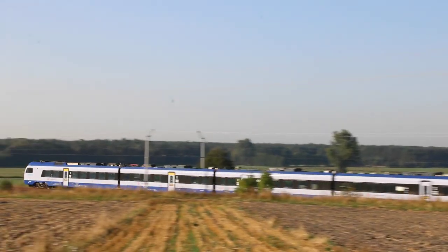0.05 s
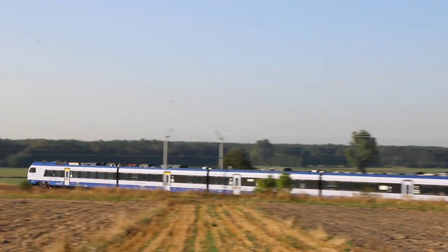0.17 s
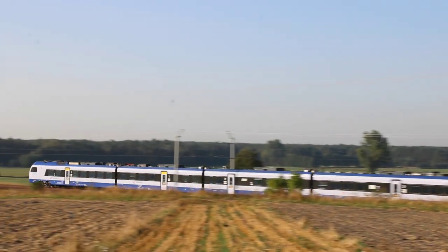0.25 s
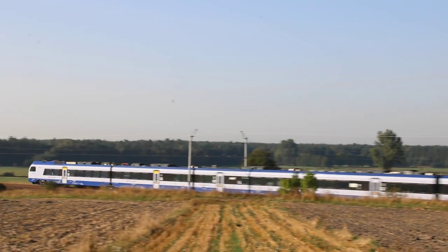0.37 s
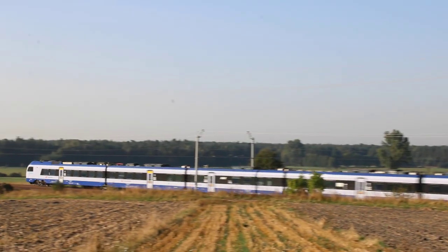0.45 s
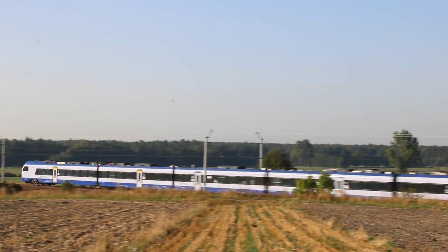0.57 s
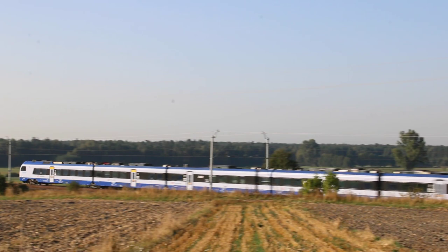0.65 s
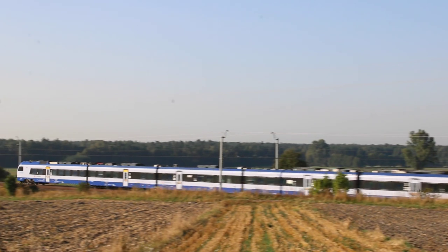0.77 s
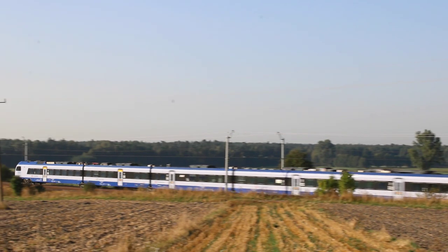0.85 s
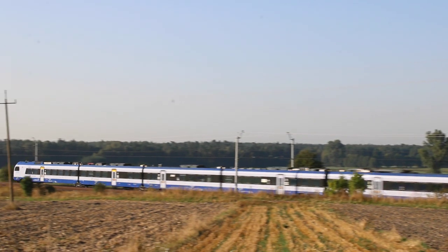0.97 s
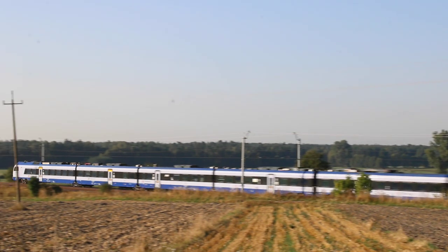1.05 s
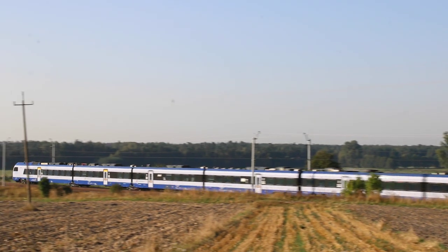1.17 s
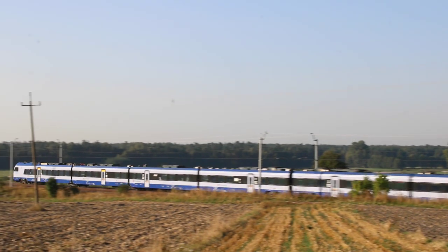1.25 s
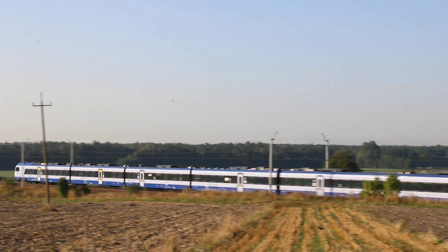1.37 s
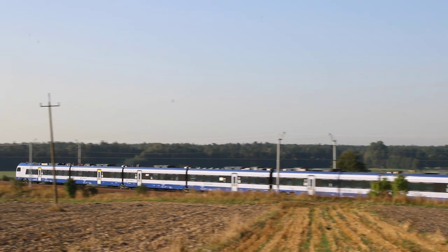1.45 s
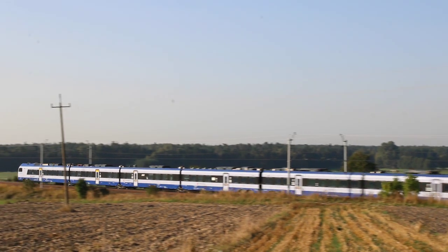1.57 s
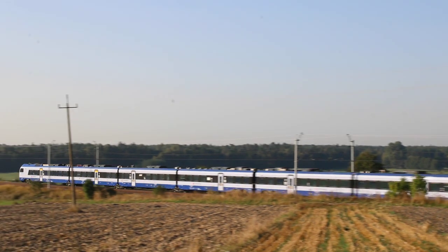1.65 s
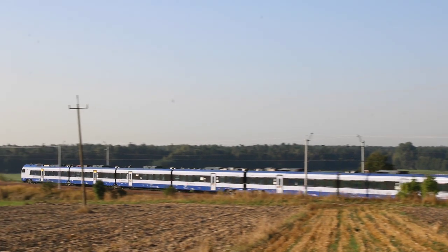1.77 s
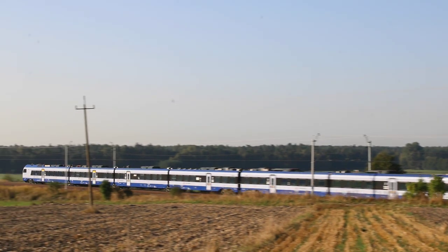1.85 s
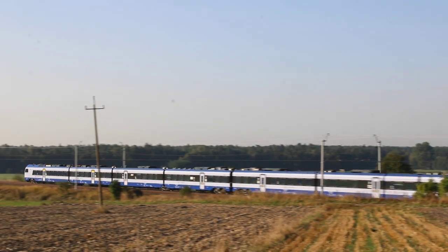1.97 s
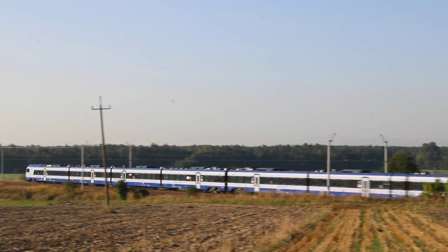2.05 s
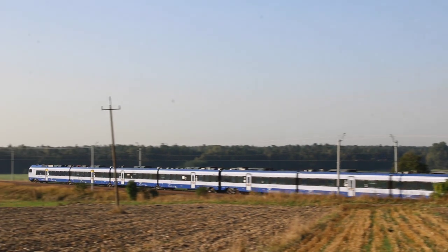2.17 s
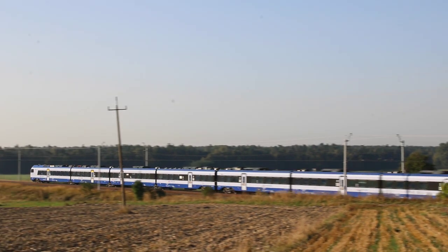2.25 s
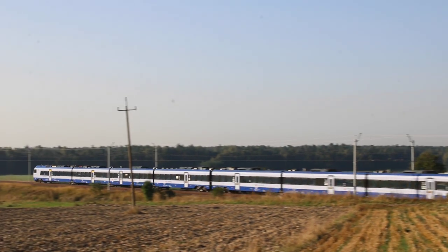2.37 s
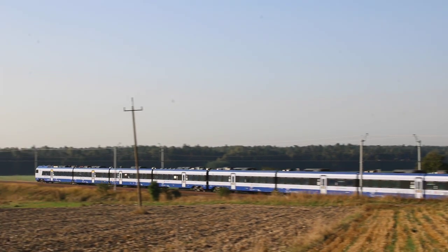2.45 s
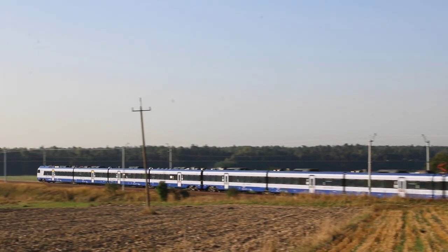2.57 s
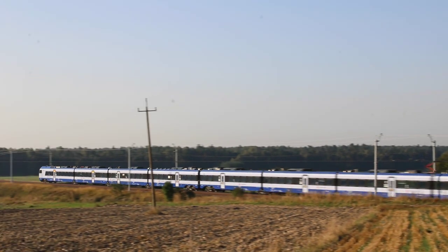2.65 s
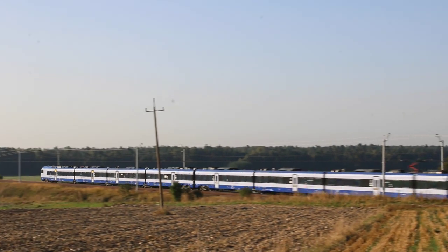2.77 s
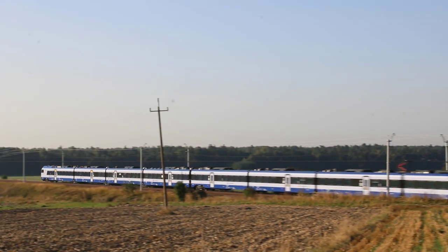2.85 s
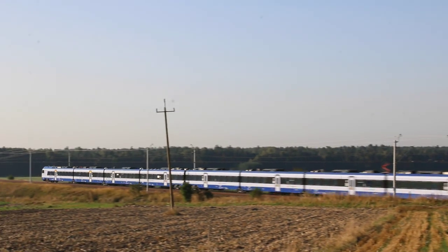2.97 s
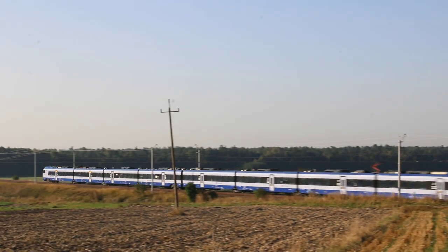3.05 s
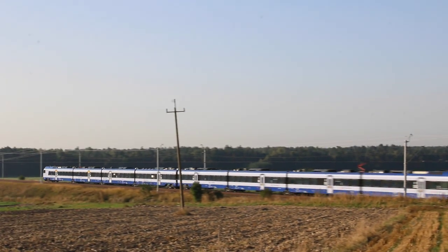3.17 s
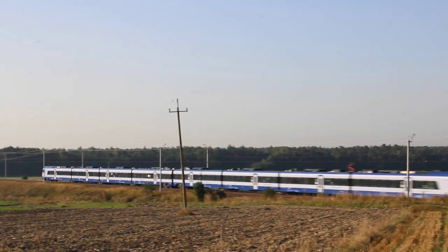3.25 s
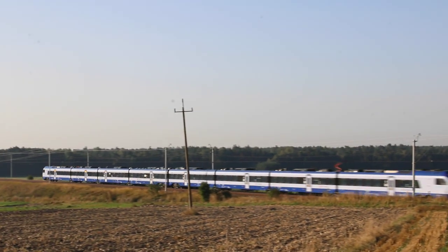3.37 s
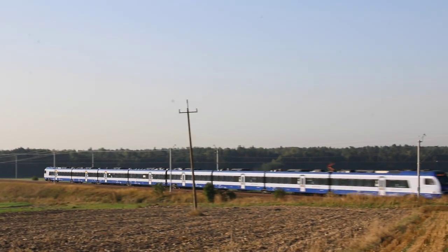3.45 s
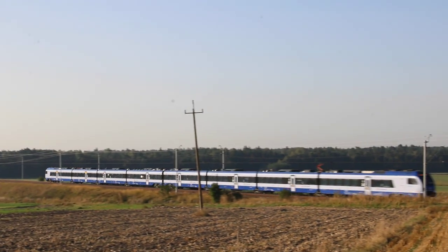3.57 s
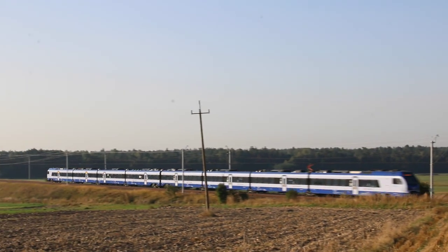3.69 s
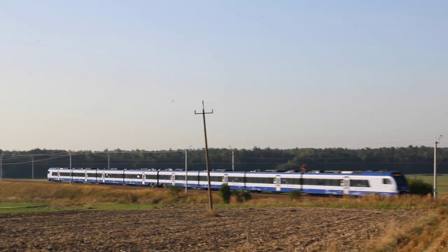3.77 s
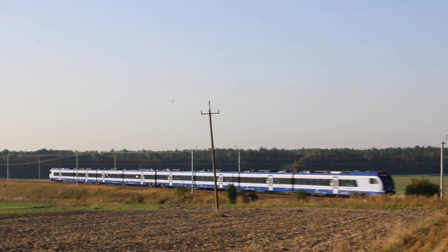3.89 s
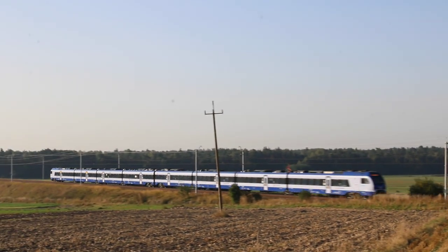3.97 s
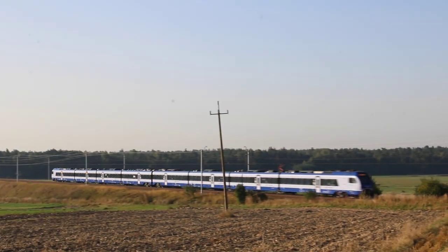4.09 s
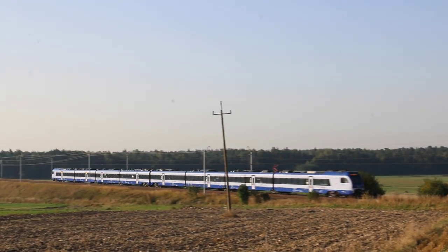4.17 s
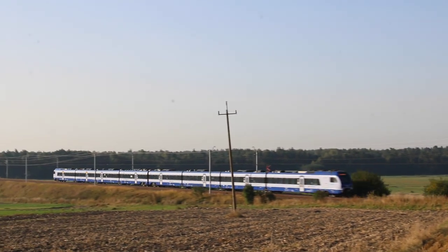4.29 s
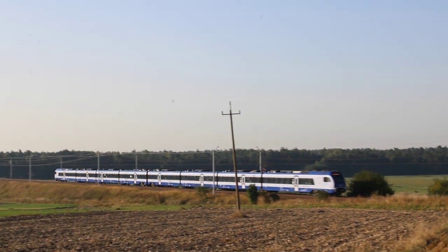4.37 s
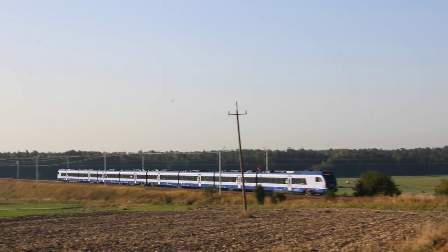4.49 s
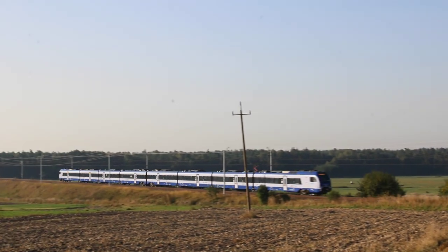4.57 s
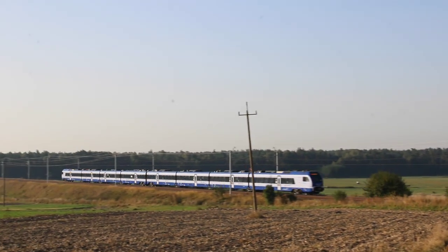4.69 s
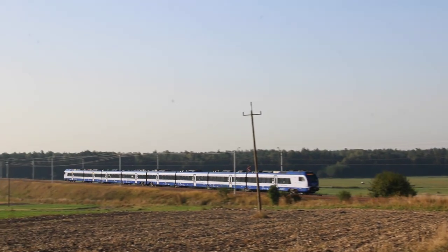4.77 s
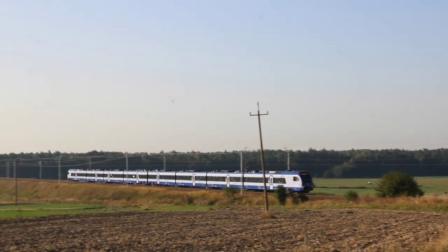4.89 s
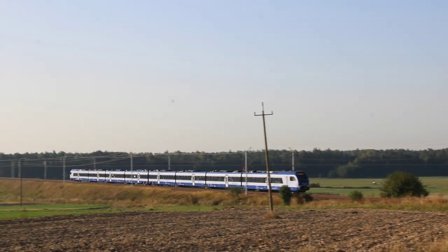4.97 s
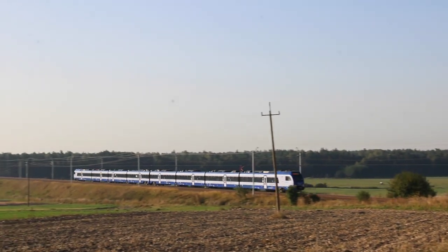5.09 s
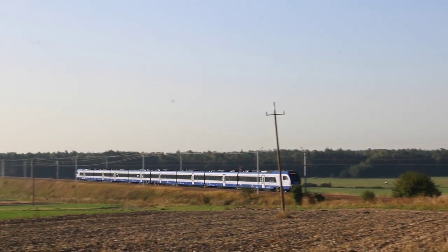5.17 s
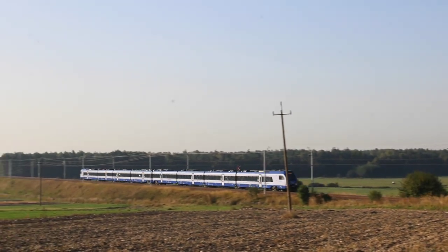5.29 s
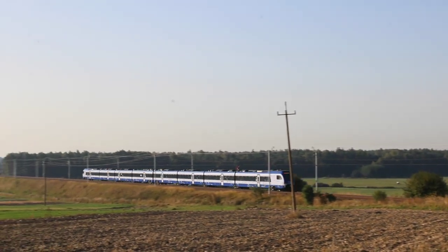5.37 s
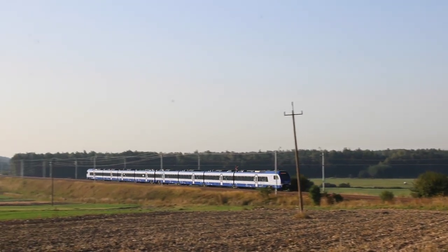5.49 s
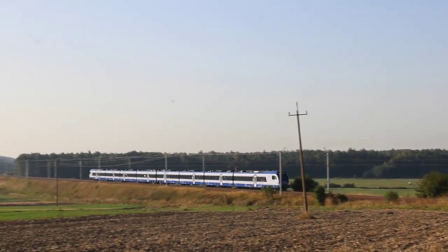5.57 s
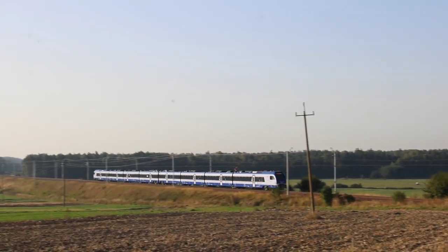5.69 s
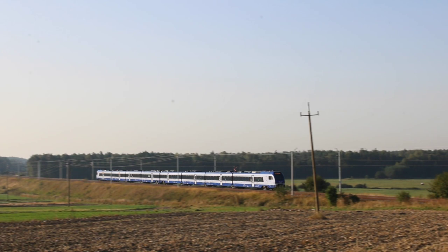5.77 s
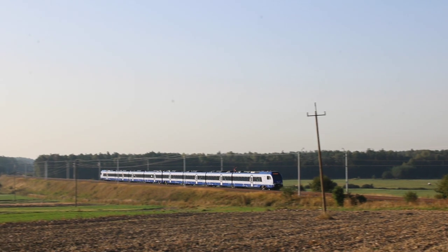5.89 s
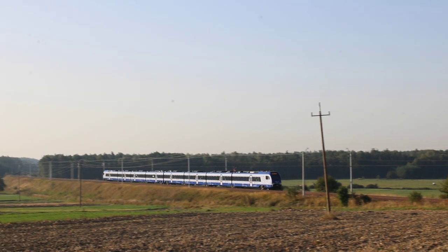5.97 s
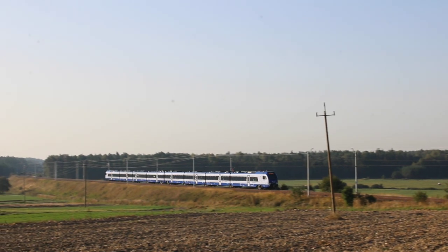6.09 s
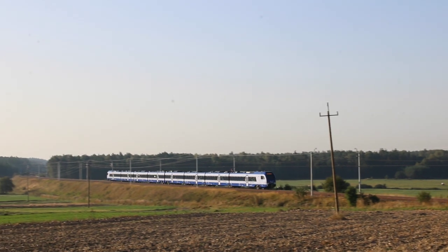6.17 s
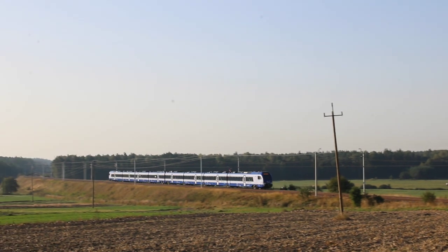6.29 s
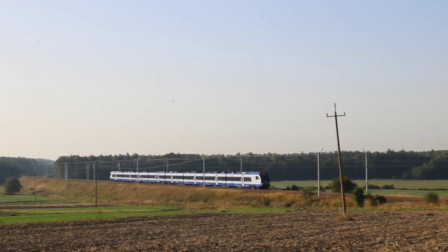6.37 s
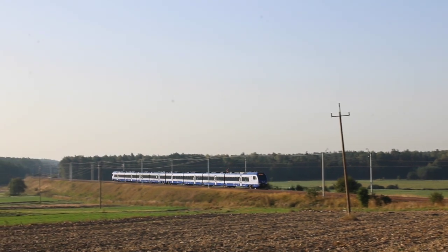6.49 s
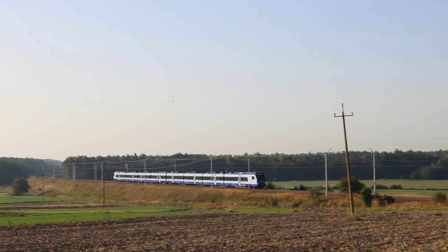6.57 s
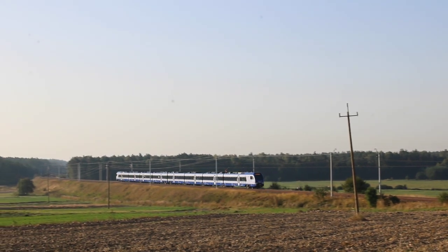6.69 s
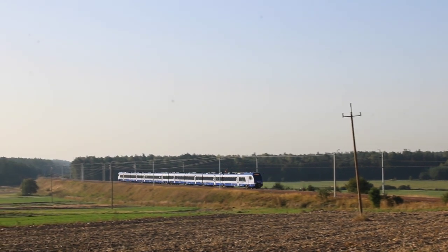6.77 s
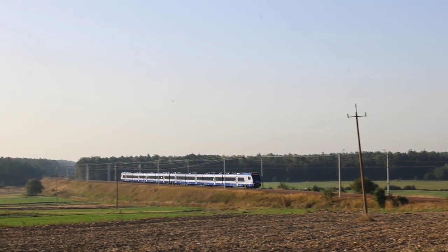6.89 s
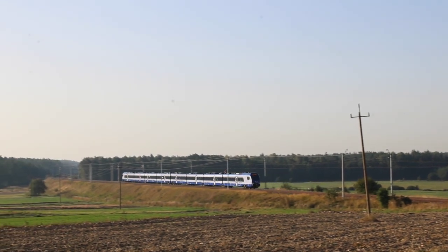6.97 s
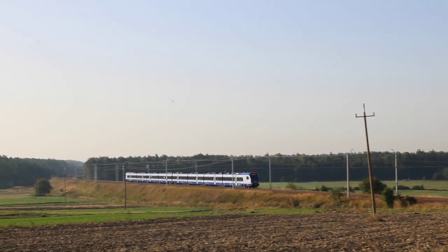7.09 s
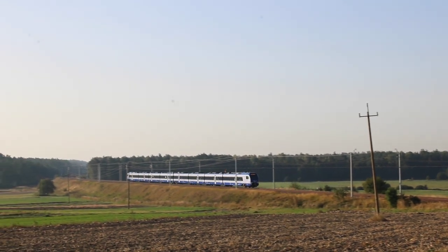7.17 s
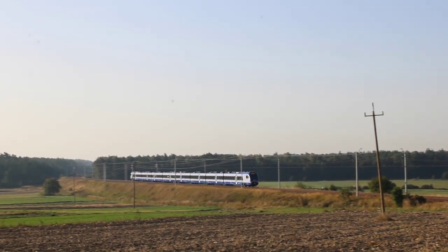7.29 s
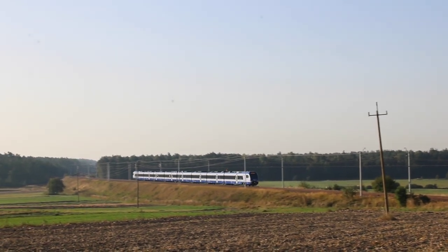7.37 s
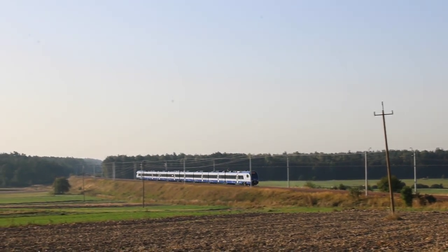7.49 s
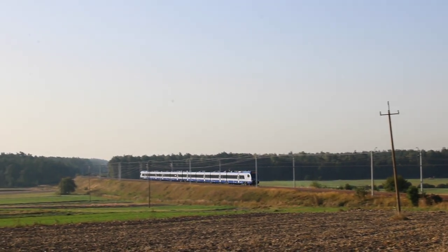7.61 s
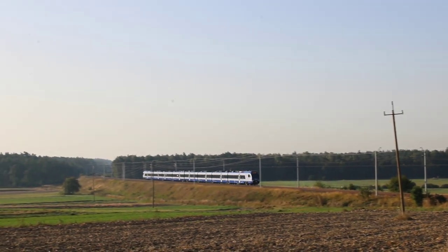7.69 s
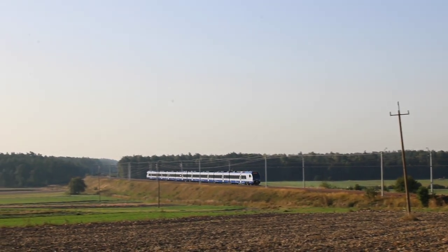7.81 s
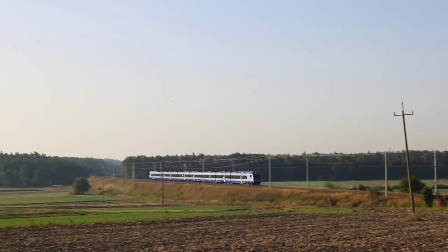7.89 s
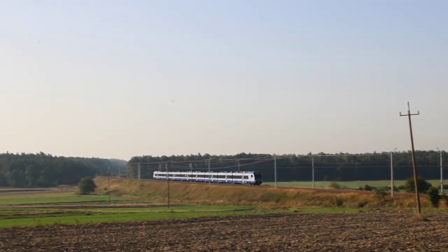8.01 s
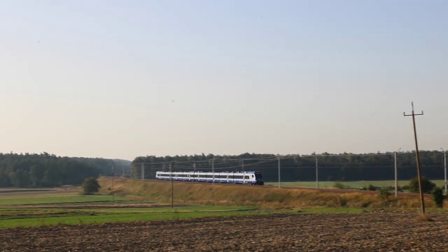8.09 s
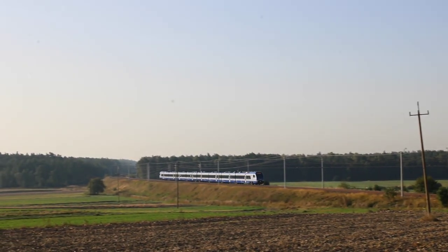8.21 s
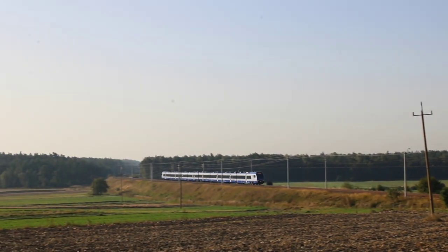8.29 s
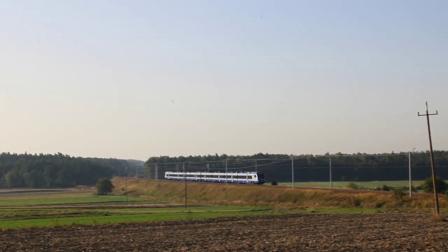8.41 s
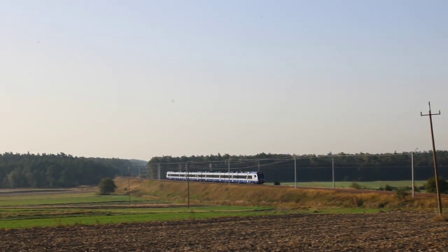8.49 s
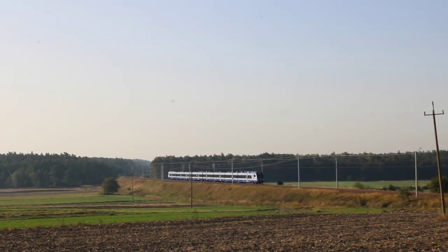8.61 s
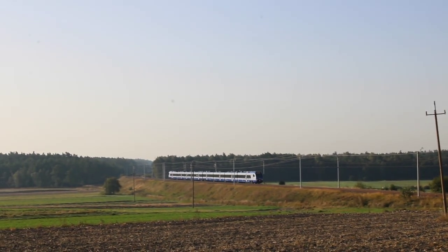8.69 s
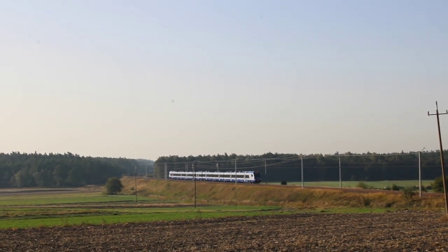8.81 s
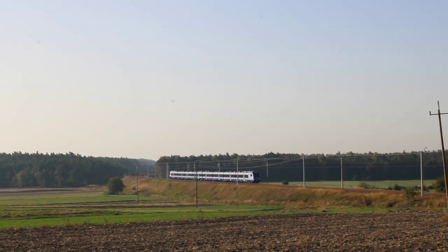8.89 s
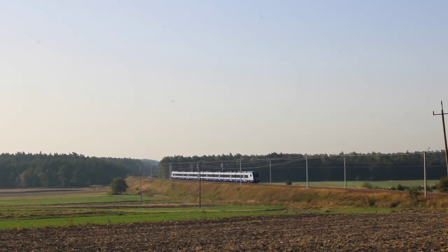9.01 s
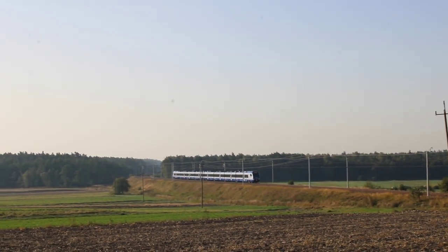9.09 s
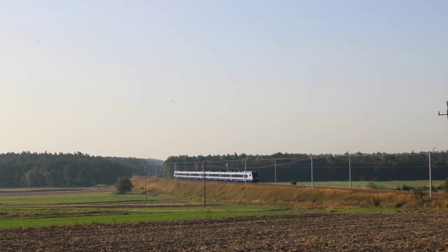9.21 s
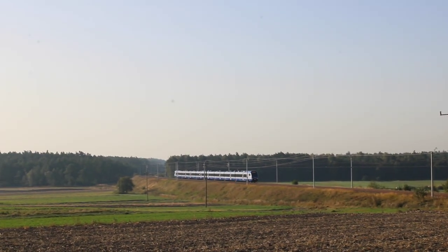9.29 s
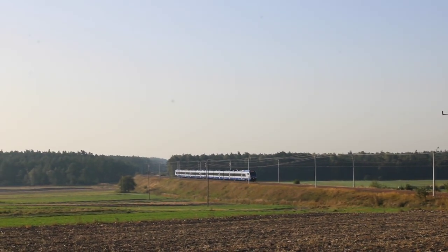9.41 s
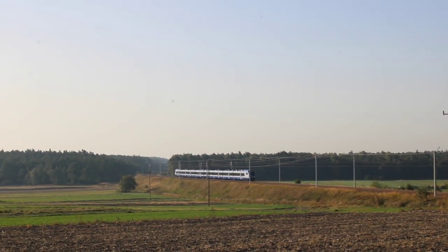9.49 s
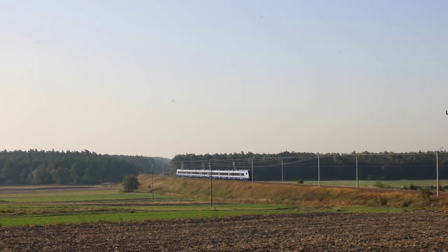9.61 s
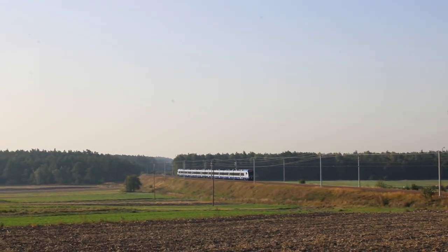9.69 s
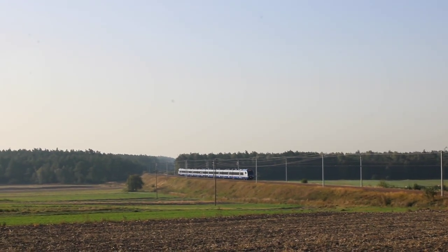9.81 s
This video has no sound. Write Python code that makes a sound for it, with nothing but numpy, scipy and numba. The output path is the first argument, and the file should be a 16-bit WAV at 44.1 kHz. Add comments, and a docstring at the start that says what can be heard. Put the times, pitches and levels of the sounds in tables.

```python
"""An electric train runs past across open fields and draws away, heard in a light breeze.
Rough rails set the wheels ringing and the drive whines, both sinking in pitch as the train recedes.
Under them the track roars and the coaches rumble; more and more air dulls the rolling noise and hiss.
Eddies thump on the microphone and the hardest duck its gain control; faint, high ticks sound close by."""
import sys
import numpy as np
from scipy import signal
from scipy.fft import rfft, irfft
from scipy.io import wavfile
from scipy.ndimage import uniform_filter1d, map_coordinates
from numba import njit

SR = 44100
rng = np.random.default_rng(int(sys.argv[2]) if len(sys.argv) > 2 else 0)


def digitize_waveform(pressure):
    """Quantize a signal to 16-bit integers and store it at the path in sys.argv[1].

    Rows of a 2-D input are taken as channels; values are limited to [-1, 1].
    """
    field = np.atleast_2d(pressure).T
    bounded = np.clip(field, -1, 1)
    quanta = np.round(bounded * 32767).astype(np.int16)
    wavfile.write(sys.argv[1], SR, quanta)


N = 434385
TIME = np.arange(N) / SR
FREQ = np.arange(N // 2 + 1) * SR / N
SPEED_M_PER_S, TRAIN_LENGTH_M, LINE_DISTANCE_M, NEAREST_S = 40, 160, 95, 1.0
# fader for the train's hiss, which the rumble also follows: time_s, level_db
HISS_FADER = [(0, -34.5), (1.3, -32), (2.8, -31), (4.2, -31.5), (7, -40), (9.85, -43)]


def undb(db):
    """Decibels to gain."""
    return 10 ** (np.asarray(db) / 20)


def fader(points):
    """Level in dB at each sample, from (time_s, level_db) points."""
    return np.interp(TIME, *np.transpose(points))


def bump(centre_s, length_s):
    """Smooth rise and fall, above half height for length_s."""
    return .5 ** ((2 * (TIME - centre_s) / length_s) ** 2)


def colour(points):
    """EQ curve through (freq_hz, level_db) points, rolled off below 15 Hz."""
    hz, db = np.transpose(points)
    return undb(np.interp(np.log(FREQ + 1), np.log(hz), db)) * FREQ ** 2 / (FREQ ** 2 + 15 ** 2)


def resonance(pitch_hz, width_hz):
    """EQ curve of a steep-sided resonance."""
    return 1 / (1 + ((FREQ - pitch_hz) / (0.76 * width_hz)) ** 2)


def bank(modes):
    """Joint EQ curve of (pitch_hz, width_hz, level_db) resonances."""
    return np.sqrt(sum((undb(db) * resonance(hz, width)) ** 2 for hz, width, db in modes))


def noise(eq):
    """Noise of rms 1 shaped by an EQ curve."""
    x = irfft(rfft(rng.standard_normal(N)) * eq, N)
    return x / x.std()


def wander(rate_hz):
    """Smooth random drift of rms 1 that changes about rate_hz times a second."""
    return noise(np.exp(-(FREQ / rate_hz) ** 2) * (FREQ > rate_hz / 8))


def distance(time_s):
    """Metres to the middle of the train."""
    return np.hypot(LINE_DISTANCE_M, SPEED_M_PER_S * (time_s - NEAREST_S))


def doppler(x, true_pitch_s=5.2):
    """Pitch sinks as the leading car recedes, passing its written value at true_pitch_s."""
    along_m = SPEED_M_PER_S * (TIME - NEAREST_S) + TRAIN_LENGTH_M / 2
    receding_mach = SPEED_M_PER_S / 343 * along_m / np.hypot(along_m, LINE_DISTANCE_M)
    ratio = 1 / (1 + receding_mach)
    ratio /= np.interp(true_pitch_s, TIME, ratio)
    return map_coordinates(x, [np.cumsum(ratio)], order=3, mode="wrap")


def air(x, pivot_hz, loss_db_per_khz_m, shimmer_db):
    """Distance tilts the spectrum; turbulence makes neighbouring bands fade in and out."""
    hz, time_s, frames = signal.stft(x, SR, nperseg=1024)
    metres = distance(time_s)
    above_pivot_khz = np.minimum(hz - pivot_hz, 4000) / 1000
    tilt_db = -loss_db_per_khz_m * np.outer(above_pivot_khz, metres - np.median(metres))
    fading = rng.standard_normal(frames.shape)
    for _ in range(2):
        fading = uniform_filter1d(fading, size=14, axis=0)  # across frequency
        fading = uniform_filter1d(fading, size=7, axis=1)  # across time
    frames *= undb(tilt_db + shimmer_db * fading / fading.std())
    return signal.istft(frames, SR)[1][:N]


@njit
def follow(x, attack, release):
    """Envelope that rises fast and falls slowly."""
    out, level = np.empty(len(x)), 0.
    for i in range(len(x)):
        level += (abs(x[i]) - level) * (attack if abs(x[i]) > level else release)
        out[i] = level
    return out


def microphone_hiss(level_db=-72):
    """A trace of the microphone's own noise."""
    # bright noise floor: freq_hz, level_db
    floor_eq = [(1000, -9), (10000, 13), (15000, -7)]
    return noise(colour(floor_eq)) * undb(level_db)


def ticks(decay_s=0.0018, faint_db=-45, faint_count=10):
    """Tiny dry ticks close to the microphone, with fainter ones at random among them."""
    # the clearest ticks, ahead of their EQ: start_s, level_db
    cues = [(4.0352, -35), (6.0467, -37), (6.1489, -33), (6.558, -35.5), (7.3611, -33), (8.8473, -34.5),
            (9.4873, -35), (9.642, -38.5), (9.8125, -37)]
    # thin, glassy top end: freq_hz, level_db
    tick_eq = [(4000, -17), (8500, 3), (10000, -4.5), (11200, 3), (11900, -20), (15000, -36)]
    strikes = np.zeros(N)
    strikes[rng.integers(0, N, faint_count)] = undb(faint_db)
    for start_s, level_db in cues:
        strikes[int(start_s * SR)] = undb(level_db)
    decays = signal.lfilter([1], [1, -np.exp(-1 / (decay_s * SR))], strikes)
    bursts = rng.standard_normal(N) * decays
    return irfft(rfft(bursts) * colour(tick_eq), N)


def wind():
    """The breeze buffets the microphone in ragged, low gusts that carry eddies."""
    # the breeze dying down: time_s, level_db
    breeze_fader = [(0, -37), (3.4, -41), (3.9, -50), (9.85, -62.5)]
    # gusts on top of it: centre_s, length_s, level_db
    gusts = [(0.076, 0.26, -34), (0.54, 0.1, -34), (0.837, 0.28, -32), (1.066, 0.11, -28.5),
             (1.433, 0.064, -31), (1.64, 0.12, -32.5), (2.053, 0.13, -25.5), (2.7, 0.18, -27.5),
             (2.95, 0.23, -25), (5.55, .12, -44), (7.574, .35, -51), (9.726, 0.047, -34),
             (9.82, 0.086, -29)]
    # bass-heavy buffeting: freq_hz, level_db
    buffet_eq = [(20, -5.5), (45, 2.5), (80, 4.5), (125, 3.5), (200, -7), (300, -8.5), (450, -19),
                 (800, -72)]
    gust_power = sum((undb(db) * bump(centre_s, length_s)) ** 2 for centre_s, length_s, db in gusts)
    force = np.sqrt(undb(fader(breeze_fader)) ** 2 + gust_power)
    buffeting = noise(colour(buffet_eq)) * force * undb(2 * wander(rate_hz=18))
    return buffeting + eddies(force)


def eddies(force, small_per_s=45, small_db=1, spread_db=8.5, lopsided=0.35, wake_s=0.019, wake_db=-18):
    """Each eddy thumps the microphone: a lopsided pressure peak between two opposite lobes."""
    # the hardest eddies: centre_s, pitch_hz, level_db
    hardest = [(.485, 97, -21), (.535, 114, -17.5), (.748, 113, -11), (.911, 138, -10), (1.144, 229, -12),
               (1.427, 113, -18), (1.514, 154, -14), (1.737, 229, -11), (1.817, 176, -13),
               (1.946, 147, -8.5), (2.1173, 204, -1), (2.139, 200, -13), (2.375, 277, -4), (2.601, 150, -6),
               (2.684, 220, -2), (2.786, 153, -8.5), (3.478, 310, -7.5), (3.4864, 115, -8),
               (3.635, 130, -21), (5.812, 150, -23), (7.524, 93, -17.5), (8.856, 55, -27),
               (9.501, 146, -21), (9.653, 114, -19.5), (9.806, 100, -11.5)]
    # finer turbulence around an eddy: freq_hz, level_db
    flutter_eq = [(40, -6), (100, 0.5), (250, -3), (500, -7.5), (800, -26), (2000, -100)]
    thumps = [(centre_s, hz, undb(db)) for centre_s, hz, db in hardest]
    # small eddies ride on the force of the wind
    for when, pitch, strength in rng.random((int(small_per_s * TIME[-1]), 3)):
        gain = force[int(when * N)] * undb(small_db + spread_db * strength)
        thumps.append((when * TIME[-1], 70 * 3.05 ** pitch, gain))
    flutter = noise(colour(flutter_eq)) * undb(wake_db)
    out = np.zeros(N)
    for centre_s, hz, gain in thumps:
        near = slice(max(int((centre_s - .04) * SR), 0), int((centre_s + .04) * SR))
        offset_s = TIME[near] - centre_s
        phase = np.pi * hz * offset_s
        pulse = (1 - 2 * phase ** 2 - 2 * lopsided * phase) * np.exp(-phase ** 2) / np.hypot(1, lopsided)
        wake = flutter[near] * np.exp(-(2 * offset_s / wake_s) ** 2)
        out[near] += gain * (pulse + wake)
    return out


def coach_rumble():
    """The coach bodies drone, fading with distance by half as many decibels as the hiss."""
    # broad low end: freq_hz, level_db
    rumble_eq = [(20, -11), (40, 5), (100, -7.5), (135, -16), (155, -11.5), (210, -8.5), (310, -16),
                 (380, -11), (600, -60)]
    # coach body resonances: pitch_hz, width_hz, level_db
    body_modes = [(54.6, 16, 4), (76.3, 12, 5.5)]
    drone = noise(np.hypot(colour(rumble_eq), bank(body_modes)))
    return drone * undb(.5 * fader(HISS_FADER) - 25.5)


def track_roar(nearest_db=-31.5, tenfold_distance_db=-7.5):
    """The track roars under the train and fades slowly with distance."""
    # midrange roar: freq_hz, level_db
    roar_eq = [(150, -23), (290, -7.5), (380, -12.5), (490, -3), (680, 1), (790, -1.5), (860, -4.5),
               (1050, -2), (1500, -1), (3000, -55)]
    level_db = nearest_db + tenfold_distance_db * np.log10(distance(TIME) / LINE_DISTANCE_M)
    return noise(colour(roar_eq)) * undb(level_db)


def train_hiss():
    """The train's top end, a hiss that distance soon dulls."""
    # treble band: freq_hz, level_db
    hiss_eq = [(2500, -18), (3600, 4), (3920, 1), (4200, 6.5), (4550, 0), (5700, 0.5), (6800, -5.5),
               (7700, -7.5), (8400, -14), (9200, -24.5), (10200, -31.5), (11500, -54.5), (15000, -67)]
    hiss = air(noise(colour(hiss_eq)), pivot_hz=5230, loss_db_per_khz_m=0.0139, shimmer_db=0.54)
    return hiss * undb(fader(HISS_FADER))


def drive_whine(peak_db=-33, peak_s=5.3, fade_db_per_s=2.4):
    """Many gears and motors turn at almost the same speed, so each tone is a narrow, beating band."""
    # faint motor tones of steady pitch that come and go: start_s, end_s, pitch_hz, width_hz, level_db
    motor_tones = [(.3, 2.6, 805, 8.3, -42), (2.2, 7.6, 949, 9.8, -44)]
    # the whine beams backwards along the line, so it peaks after the train has passed
    whine_db = peak_db - fade_db_per_s * np.abs(TIME - peak_s)
    out = doppler(noise(resonance(pitch_hz=1513, width_hz=20))) * undb(whine_db)
    for start_s, end_s, pitch_hz, width_hz, level_db in motor_tones:
        position = (2 * TIME - start_s - end_s) / (end_s - start_s)
        swell = np.sqrt(np.maximum(0, 1 - position ** 2))
        out += noise(resonance(pitch_hz, width_hz)) * swell * undb(level_db)
    return out


def wheel_ring(pitch_hz, width_hz, level_db, waver_db, waver_hz):
    """One wheel mode sings out unevenly and sinks in pitch."""
    tone = doppler(noise(resonance(pitch_hz, width_hz)))
    return tone * undb(level_db + waver_db * wander(waver_hz))


def wheels():
    """Rough rails shake the wheels: broad rolling noise, a bed of resonances and two clear rings."""
    # rolling noise: freq_hz, level_db
    rolling_eq = [(700, -47.5), (950, -13), (1230, -2), (1450, -2), (1680, 3), (1950, -1.5), (2090, -1.5),
                  (2550, 0), (2780, -3), (3250, -7.5), (3900, -17.5), (5000, -26), (8000, -76)]
    # weaker resonances, the wide ones clusters from many wheels: pitch_hz, width_hz, level_db
    bed_modes = [(1850, 180, 1), (2233, 28, 6.5), (2370, 210, 3.5), (2490, 22, 0), (2828, 38, 3.5),
                 (3087, 36, 3), (3140, 260, .5), (3565, 90, -2.5), (3780, 20, -1.5)]
    # the discs radiate sideways, so the bed shows most as the tail swings away: time_s, level_db
    beam_fader = [(0, -13), (2.4, -8), (3.3, 0.5), (4.3, -2.5), (9.85, 8)]
    # wheel modes flare up: centre_s, length_s, lower_ring_db, upper_ring_db, bed_db
    flares = [(.25, 0.65, -0.5, 5.5, 0), (3.28, 0.73, 0, 8.5, 0), (5.1, 0.49, -3, 1.5, 1),
              (6.3, 0.45, 2, 0, 3), (7.3, 0.52, 5.5, -5, 0), (7.952, .3, -4, -2, 2.5),
              (8.53, .22, 4, 9.5, 0), (8.953, .25, 7, 1.5, 0), (9.55, 0.27, -6, 5, 1.5)]
    # all the wheel sound, loudest as the tail goes by: time_s, level_db
    wheel_fader = [(0, -30.5), (1.1, -26.5), (2.6, -22.5), (3.35, -20.5), (3.8, -22), (5.15, -23), (7, -29),
                   (8.35, -28), (8.85, -31), (9.85, -31.5)]
    lower_db, upper_db, bed_db = sum(np.outer(boosts_db, bump(centre_s, length_s))
                                     for centre_s, length_s, *boosts_db in flares)
    bed_mix = undb(fader(beam_fader) - 1)
    broad = noise(colour(rolling_eq))
    bed = noise(bank(bed_modes)) * undb(bed_db)
    rolling = (broad + bed_mix * bed) / np.hypot(1, bed_mix)  # equal-power blend
    rolling = air(doppler(rolling), pivot_hz=2200, loss_db_per_khz_m=0.0557, shimmer_db=0.6)
    # ring levels are relative to the rolling noise
    lower = wheel_ring(pitch_hz=1836, width_hz=80, level_db=lower_db - 7.5, waver_db=1.0, waver_hz=11)
    upper = wheel_ring(pitch_hz=2309, width_hz=21, level_db=upper_db - 12.5, waver_db=1.94, waver_hz=14)
    return (rolling + lower + upper) * undb(fader(wheel_fader))


def scene():
    """Train, wind and ticks at one microphone, the same in both channels."""
    noise_floor = microphone_hiss()
    train = track_roar() + coach_rumble() + train_hiss() + wheels() + drive_whine()
    mono = noise_floor + train + wind() + ticks()
    return np.array([mono, mono])


def record(dry, attack_s=0.0014, release_s=0.36, threshold_db=-9.5, lag_s=0.012, top_hz=15400):
    """Gain control ducks after the hardest thumps; peaks clip and the top is cut."""
    envelope = follow(dry[0], 1 / (attack_s * SR), 1 / (release_s * SR))
    duck = 1 - np.minimum(1, undb(threshold_db) / (envelope + 1e-9))
    # the gain comes down too slowly to catch the thump itself
    gain = 1 - signal.lfilter([1], [1, -np.exp(-1 / (lag_s * SR))], duck) / (lag_s * SR)
    high_cut = signal.ellip(8, .2, 70, top_hz, fs=SR, output="sos")
    return signal.sosfilt(high_cut, np.clip(dry * gain, -1, 1))


dry = scene()
out = record(dry)
digitize_waveform(out)
```